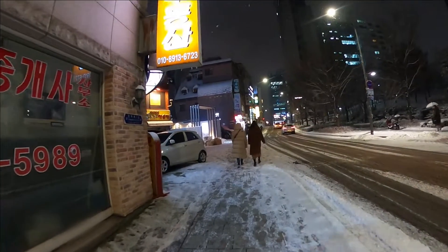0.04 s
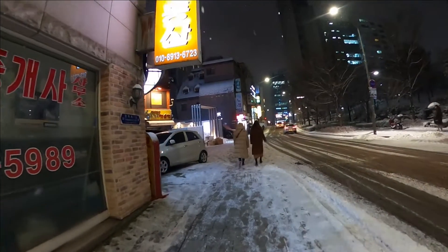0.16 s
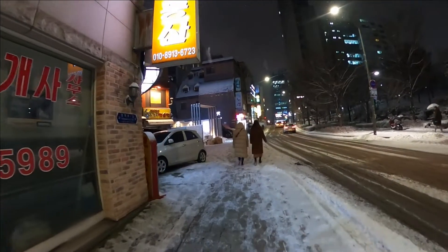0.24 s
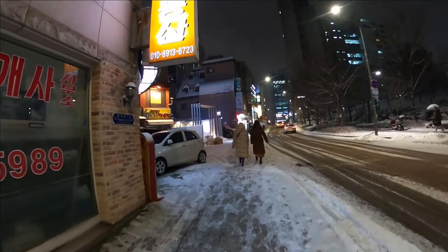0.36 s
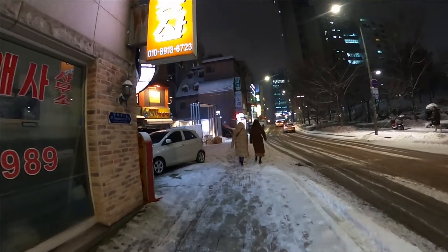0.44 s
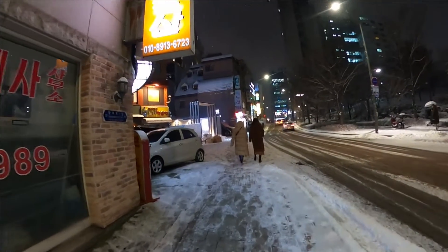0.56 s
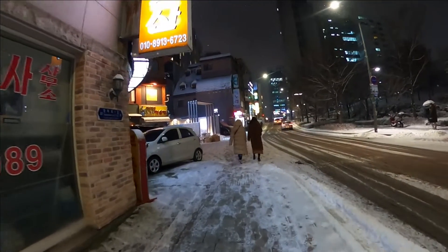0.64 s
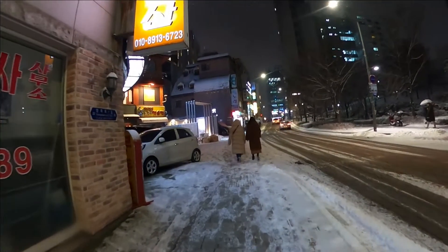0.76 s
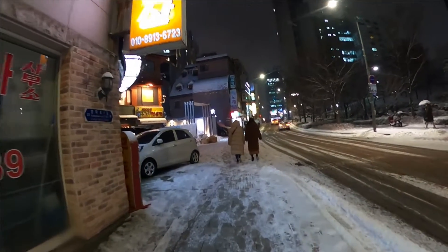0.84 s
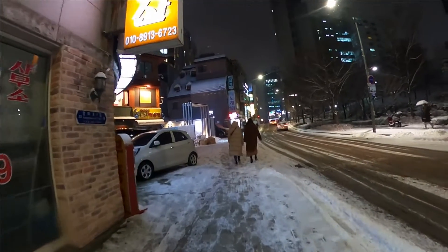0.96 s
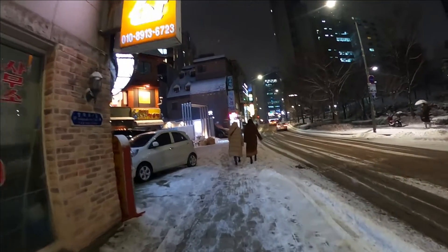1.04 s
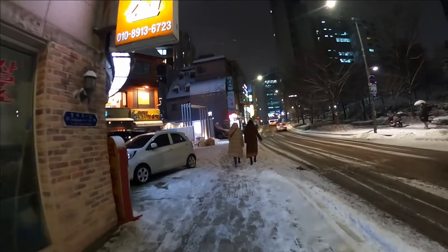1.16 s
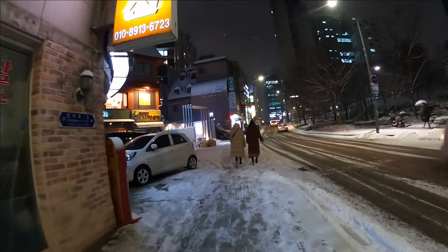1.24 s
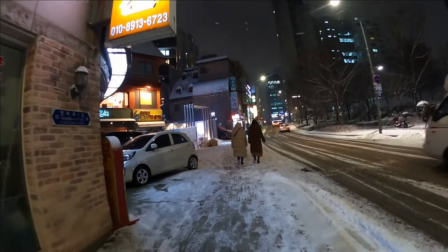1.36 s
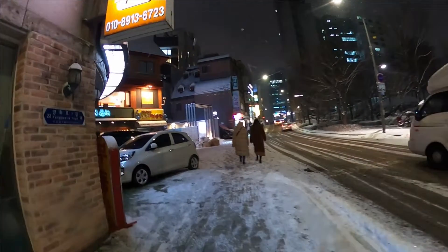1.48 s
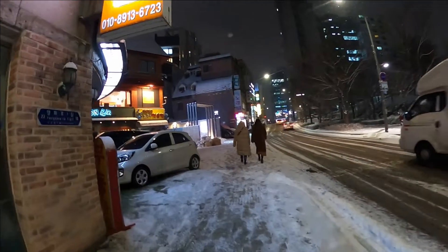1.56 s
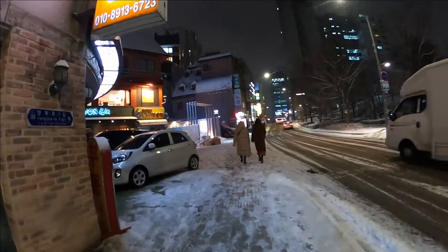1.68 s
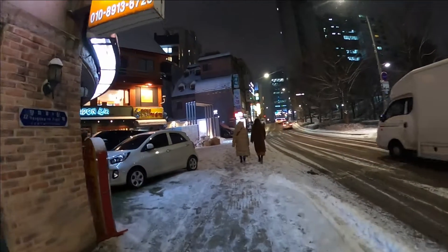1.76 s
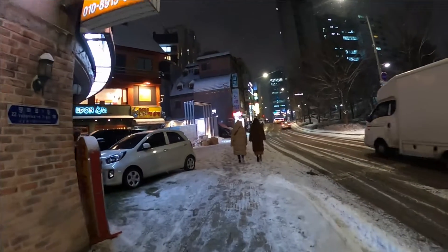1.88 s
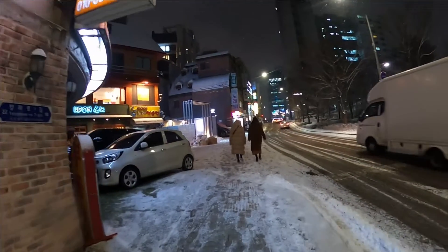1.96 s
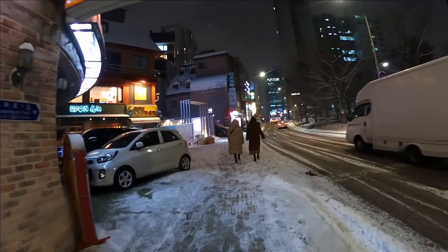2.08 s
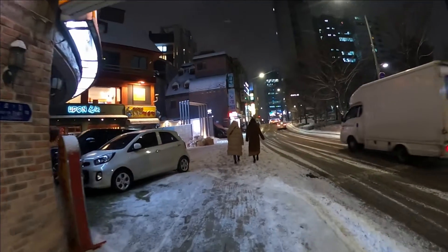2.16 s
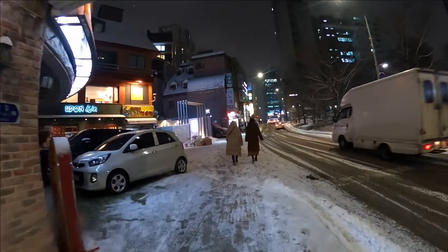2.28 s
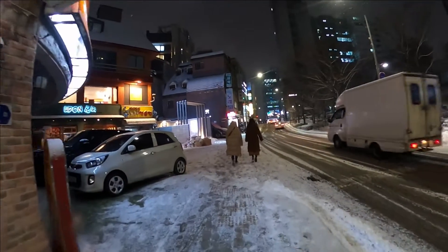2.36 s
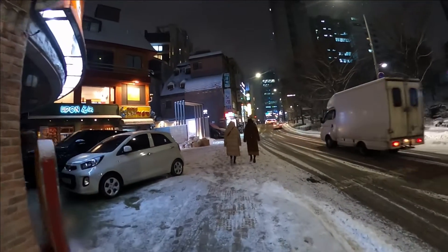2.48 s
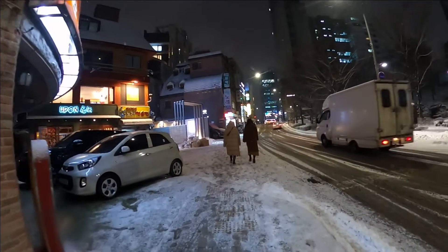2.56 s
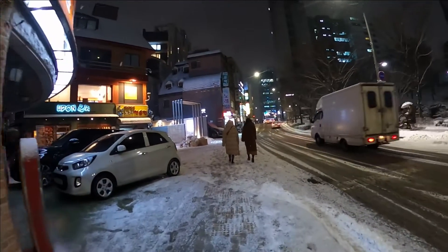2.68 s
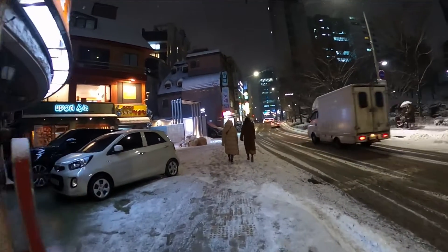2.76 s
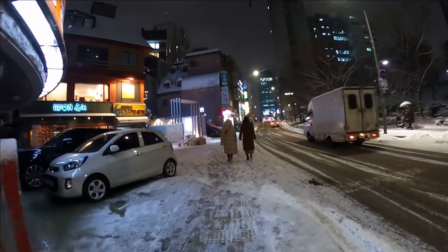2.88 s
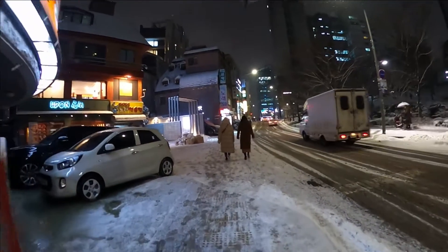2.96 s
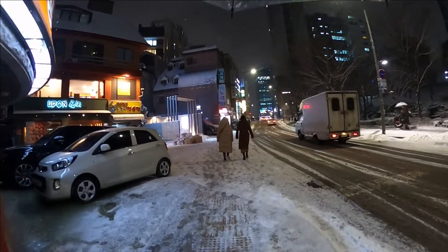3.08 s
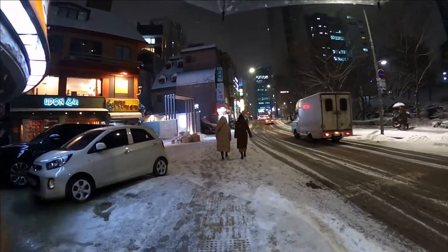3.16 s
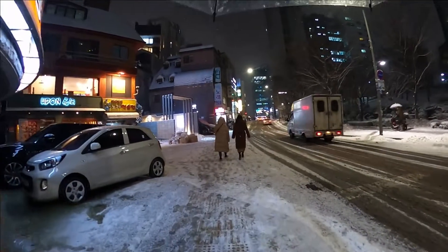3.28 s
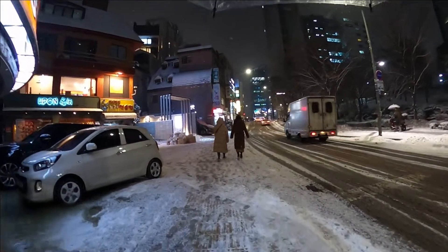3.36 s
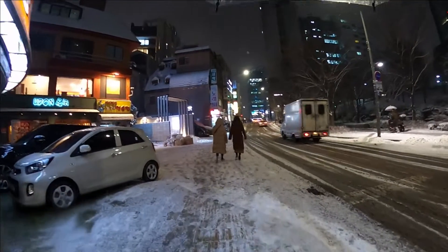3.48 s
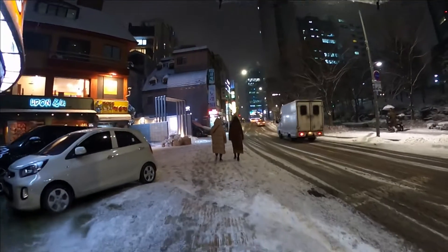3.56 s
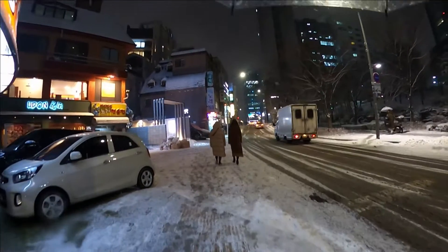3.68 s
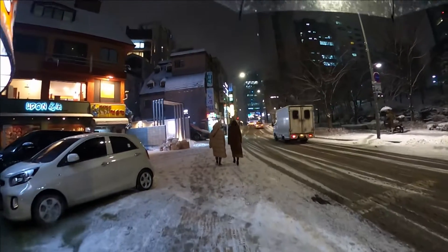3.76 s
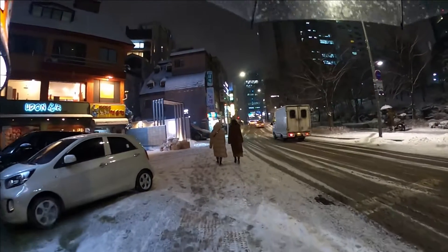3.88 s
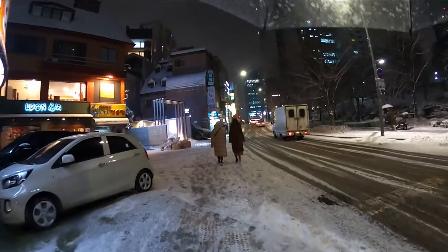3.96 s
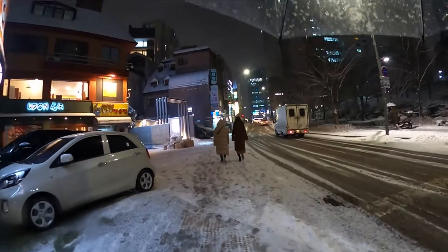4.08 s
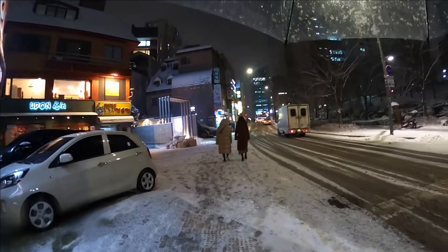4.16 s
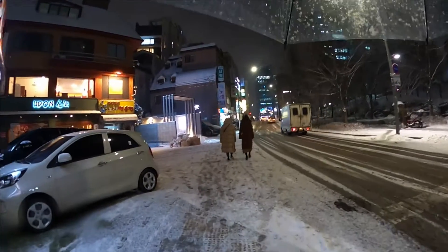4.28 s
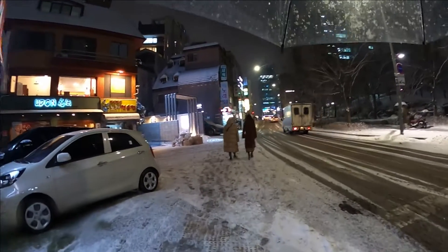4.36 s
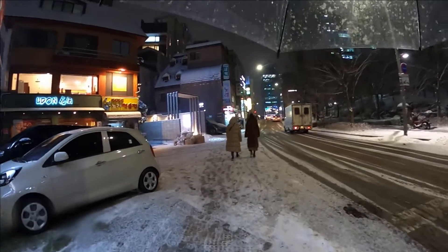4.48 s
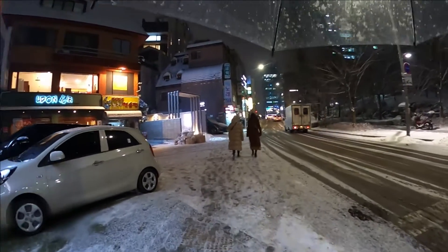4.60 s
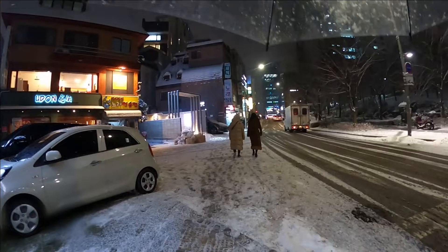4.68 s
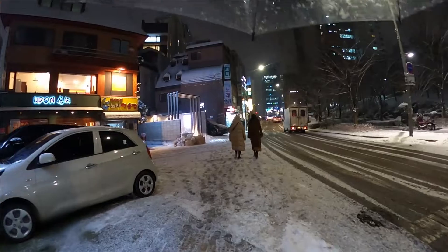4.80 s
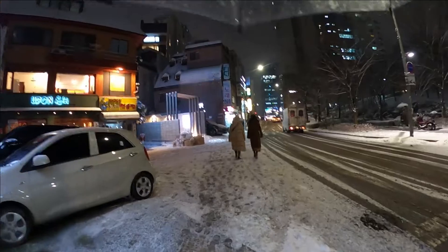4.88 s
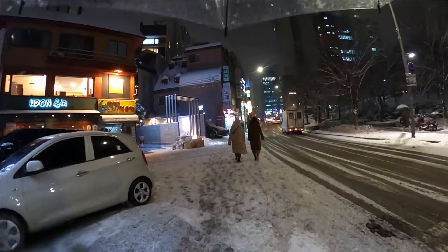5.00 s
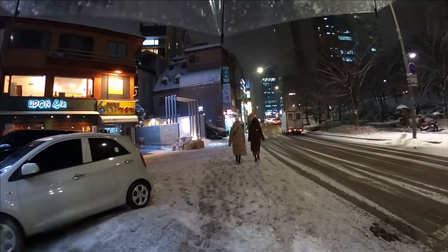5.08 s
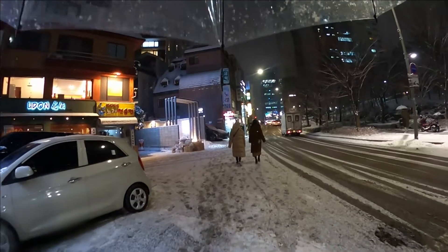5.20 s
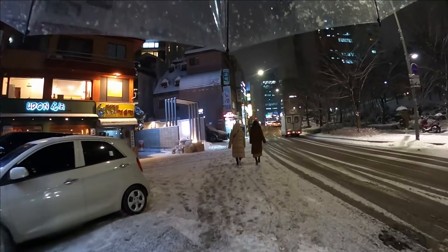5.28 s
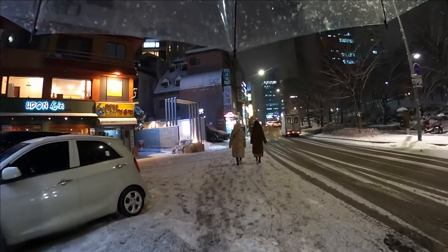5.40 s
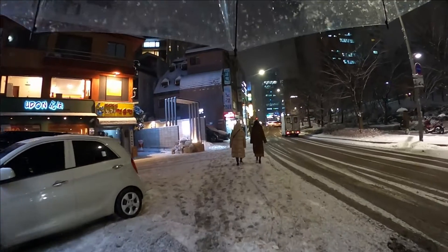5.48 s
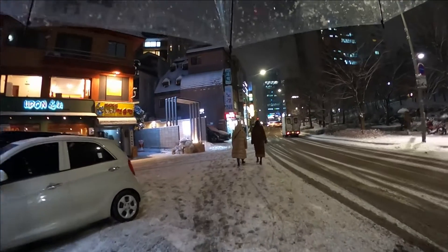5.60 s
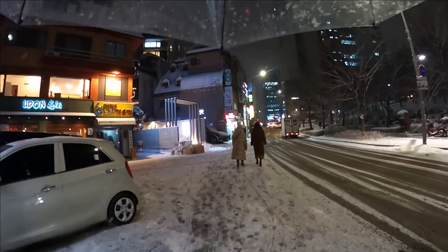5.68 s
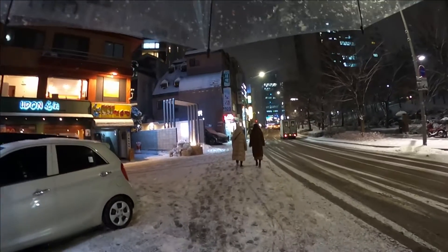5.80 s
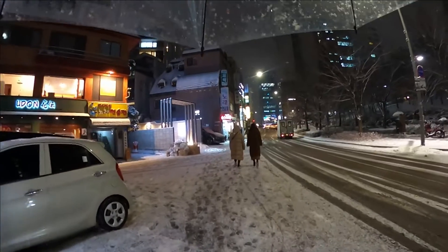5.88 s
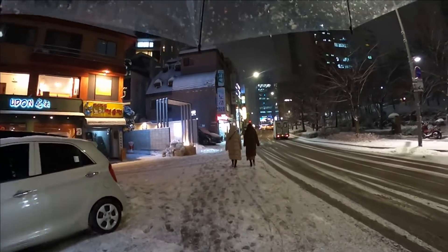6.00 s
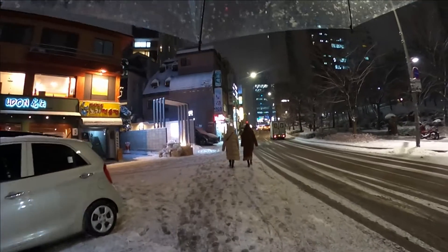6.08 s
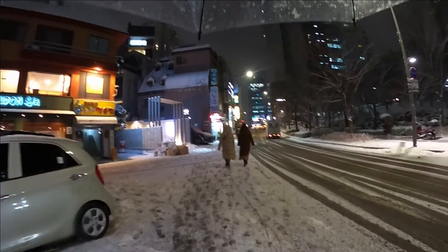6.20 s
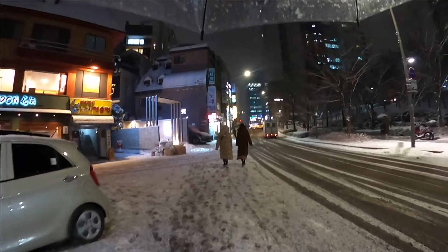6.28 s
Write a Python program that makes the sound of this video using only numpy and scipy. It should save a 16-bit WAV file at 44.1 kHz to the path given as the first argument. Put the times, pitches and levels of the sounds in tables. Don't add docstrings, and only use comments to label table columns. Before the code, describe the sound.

Outdoor stereo recording on a snowy city pavement at night. A box van passes close, its tyres roaring and hissing through slush over a low engine drone. After about two seconds it falls away sharply and dulls into distant wash. Wind buffets the microphones, wet drips tick, and later a shoe scuffs slush beside faint coat rustle and buzzing.

```python
import sys
import numpy as np
from scipy import signal
from scipy.io import wavfile
from scipy.ndimage import uniform_filter1d

SR = 44100
rng = np.random.default_rng(int(sys.argv[2]) if len(sys.argv) > 2 else 0)


def to_wav(sig):
    pcm = np.clip(np.atleast_2d(sig), -1, 1) * 32767
    pcm = np.round(pcm).astype(np.int16)
    wavfile.write(sys.argv[1], SR, pcm.T)


def linear_from_db(decibels):
    return 10 ** (np.asarray(decibels, float) / 20)


N = 279592
SIZE, HOP = 1024, 256
HZ = np.fft.rfftfreq(SIZE, 1 / SR)[:, None]
FRAMES = np.arange(N // HOP + 5) * HOP / SR
TIME = np.arange(N) / SR

# time_s, loudness_db (below the closest pass), slush_wetness_db
VAN_PASSAGE = [(0, -5.5, 0), (.15, -2.5, 0), (.32, -2, 0.5), (.56, -1, 1), (.97, 0, 1), (1.41, 0.5, 0),
               (1.85, 1, -1.5), (1.98, .5, -0.5), (2.07, -2.5, -1.5), (2.17, -7, 0), (2.33, -11.5, 1.5),
               (2.6, -14.5, 3), (3.0, -16.5, 2.5), (3.3, -18, 1), (3.74, -19, 3.5), (4.08, -16.5, -5.5),
               (4.35, -19, -1.5), (4.8, -19.5, -3.5), (5.15, -21.5, -3), (6.34, -21, -2.5)]
# frequency_hz, density_db (per Hz)
NEAR_COLOUR = [(70, -28), (120, -4), (180, -4.5), (290, -9.5), (450, -10.5), (560, -7.5), (800, -15),
               (1120, -12), (2640, -14), (6100, -17), (7730, -23), (9650, -41.5), (13000, -56),
               (15300, -55)]
# frequency_hz, density_db (per Hz)
FAR_COLOUR = [(70, -50), (120, -12), (170, -2), (290, -9), (400, -12.5), (560, -11.5), (730, -16),
              (1290, -19), (2200, -24), (3400, -25), (6300, -37), (8200, -44.5), (12900, -48.5),
              (15300, -65)]
# time_s, centre_hz, height_db
GROUND_ECHO = [(0, 2740, 4), (.5, 2780, 1), (.9, 2940, 2), (1.3, 1980, 0.5), (1.8, 1480, 2.5),
               (2.3, 1400, 3.5), (3, 1720, 3.5), (6.34, 1630, 2)]
# level_db (at the pass), loudness_share, wetness_share, gone_db (added once gone)
TYRE_LAYERS = [
    (-28.5, 0.6, 0.5, 0.05),
    (-25, 1, .01, 0),
    (-32.5, 1.035, 0.9, -0.3),
    (-52.5, 0.79, 1.54, -24.5),
]
# frequency_hz, side_minus_mid_db
PORT_WIDTH = [(60, -9), (200, -36), (700, -22), (1050, -22), (1300, -8), (1700, -4), (2400, -6.5),
              (4400, -5), (8100, -4.5), (11000, -4), (15000, -6)]
# frequency_hz, density_db (per Hz)
RUMBLE_COLOUR = [(8.8, -32), (15, -2), (43, 5.5), (135, -7), (173, -10), (219, -9.5), (284, -29),
                 (400, -23.5), (520, -57), (880, -120)]
# top_s, level_db, rise_s, fall_s
WIND_SWELLS = [(.21, -23.5, 0.06, 0.035), (.31, -26, 0.036, 0.13), (.55, -24, 0.11, 0.18),
               (1.52, -24.5, 0.033, 0.046), (1.61, -22, .05, .05), (1.84, -29, 0.24, 0.045),
               (1.98, -19.5, .08, 0.054), (2.17, -26.5, 0.13, 0.036), (2.28, -31, 0.057, 0.064),
               (3.23, -31, 0.04, 0.056), (3.47, -30, 0.17, .04), (3.7, -36, 0.39, 0.17),
               (3.88, -29, 0.095, 0.11), (3.98, -27, .1, 0.039), (4.32, -35.5, 0.053, 0.27),
               (4.59, -26, 0.13, 0.087), (4.7, -37, .07, 0.085), (5.05, -32.5, 0.087, .04),
               (5.15, -46, .1, 0.19), (5.66, -41, .3, .04), (5.77, -45, .05, 0.12), (6.2, -43, .35, .4)]
# time_s, peak_db
PORT_POPS = [(.342, -26), (.394, -25), (.468, -18), (.594, -21), (.732, -25), (1.293, -26), (1.732, -27),
             (1.835, -14), (1.961, -6), (2.095, -24), (2.168, -24), (2.269, -20)]
# start_s, length_s, pitch_hz, level_db,
# drift_db_per_s
DRONE_LINES = [(0.0499, 0.553, 94.6, -31, 0.5), (1.3, .27, 81, -29.5, -12), (1.3, 0.223, 82, -36, 7),
               (0.11, .58, 189, -34, -1), (3.75, 0.78, 4830, -70, -2), (1.3, 1.2, 192.8, -34, -16),
               (.82, 0.17, 166, -34.5, 25), (1.06, 0.47, 168, -36, 2), (1.72, 0.37, 166, -23, -35),
               (2.14, 0.27, 169, -37, -50), (2.68, 1.53, 170, -43, -2), (5.55, 0.398, 175.5, -42.5, 3),
               (0.63, 0.42, 95, -27, 2), (.92, 1.75, 331, -37.5, -5.5), (1.08, 0.94, 535, -41.5, 7.5),
               (1.8, 0.68, 536, -37.5, -15), (3.1, 1.85, 536, -55.5, 1), (.03, 0.94, 569, -49, 12.5),
               (1.14, .13, 582, -35, 5), (1.25, .95, 520, -40, -6), (2.95, 1.64, 581, -52, -2),
               (1.0, .9, 399, -45, 2), (0.023, .5, 530, -64, .1), (1.4, 0.33, 241, -41, -3)]
# start_s, peak_db, pitch_hz, ring_s (fall by 60 dB)
SNOW_DRIPS = [(.167, -17, 2400, 0.011), (1.513, -12, 1500, 0.016), (2.021, -14.5, 1620, 0.011),
              (2.3836, -19, 1270, .011), (3.042, -38, 830, .012), (4.321, -32, 1649, .013),
              (3.9, -38, 2800, 0.015), (4.474, -29, 1240, 0.012), (4.632, -27, 775, 0.036),
              (4.634, -35, 2940, .025), (4.645, -26, 960, 0.0094), (5.321, -38, 1690, 0.013)]
# start_s, peak_db, pitch_hz, ring_s (fall by 60 dB)
HOLLOW_BUMPS = [
    (3.0, -30.5, 249, 0.25),
    (4.636, -27.5, 286, 0.12),
    (4.64, -34, 900, .07),
    (4.66, -35, 580, 0.053),
]
# top_s, level_db, rise_s, fall_s
COAT_SWISHES = [(2.85, -82, .5, 1.0), (3.73, -73, .2, .04), (4.46, -77, .12, .06), (4.3, -86, .3, .2),
                (4.65, -81, 0.033, .3), (5.01, -80, .2, .2), (5.4, -74, .12, 0.22), (5.52, -72, .2, .15),
                (5.655, -77, .03, .15), (6.22, -73, .08, 0.19), (6.31, -72, .06, .1)]
# frequency_hz, density_db (per Hz)
COAT_COLOUR = [(2000, -33), (4000, 3.5), (7000, -1.5), (10000, -10.5), (13000, -18.5), (14500, -21),
               (15600, -30)]
# top_s, level_db, rise_s, fall_s
SHOE_DRAGS = [
    (4.638, -35.5, .01, 0.16),
    (4.325, -49, .012, .03),
    (4.97, -50, .07, .055),
]
# centre_hz, width_hz, level_db
SHOE_RINGS = [(286, 250, 4.5), (576, 130, 8.5), (900, 250, 8), (1400, 950, 5), (2040, 1600, -1),
              (2920, 1200, -9.5), (4800, 2800, -18)]
# top_s, level_db, rise_s, fall_s
BUZZ_SWELLS = [(4.62, -59.5, .2, .15), (4.93, -57.5, 0.074, 0.13), (5.55, -59.5, .24, 0.33),
               (5.86, -58.5, .07, 0.22), (6.22, -60.5, 0.14, 0.26)]
# multiple (of twice the mains), level_db
BUZZ_ORDERS = [(5, -8), (7, -7), (9, -0.5), (10, 6.5), (11, -5), (12, -34), (13, -3.5), (14, -10)]


def evened(x):
    return x / np.sqrt(np.mean(abs(x) ** 2) + 1e-20)


def colour(points):
    hz, value = np.transpose(points)
    return np.interp(np.log(HZ + 1), np.log(hz + 1), value)


def curves(rows, t):
    s, *columns = np.transpose(rows)
    return [np.interp(t, s, column) for column in columns]


def chance():
    z = rng.standard_normal((len(FRAMES), len(HZ), 2))
    return (z[..., 0] + 1j * z[..., 1]).T


def sound(spectra):
    return signal.istft(spectra, nperseg=SIZE, noverlap=SIZE - HOP)[1][..., :N] / 27.4


def in_band(gain, lo_hz, hi_hz):
    inside = (HZ >= lo_hz) & (HZ < hi_hz)
    return gain / np.sqrt(np.mean(gain ** 2 * inside, axis=0))


def patches(bins, frames):
    z = rng.standard_normal((len(FRAMES), len(HZ))).T
    z = uniform_filter1d(z, size=bins, axis=0)
    return evened(uniform_filter1d(z, size=frames, axis=1))


def resonate(x, hz, width_hz):
    turn = np.exp(2j * np.pi * np.cumsum(hz * np.ones(len(x))) / SR)
    r = np.exp(-np.pi * width_hz / SR)
    return 2 * (turn * signal.lfilter([1 - r], [1, -r], x / turn)).real


def resonate_twice(x, hz, width_hz):
    return resonate(resonate(x, hz, width_hz), hz, width_hz)


def swells(rows, t):
    drop_db, drop_curve = -12.5, 1.47
    coarse = t[::64]
    power = np.zeros(len(coarse))
    for s, db, rise, fall in rows:
        away = np.where(coarse < s, (s - coarse) / rise, (coarse - s) / fall)
        power += linear_from_db(db + drop_db * away ** drop_curve) ** 2
    return np.interp(t, coarse, np.sqrt(power))


def slow(count, seconds):
    size = max(round(seconds * SR), 1)
    z = uniform_filter1d(rng.standard_normal(2 * SR), size=size)
    return evened(uniform_filter1d(z, size=size))[:count]


def add(mix, s, part):
    place = mix[max(round(s * SR), 0):][:len(part)]
    place += part[:len(place)]


def traffic_gain(gone):
    bump_hz, bump_db = curves(GROUND_ECHO, FRAMES)
    bump = bump_db * np.exp(-(np.log((HZ + 1) / bump_hz) / 0.2) ** 2)
    gain = linear_from_db((1 - gone) * colour(NEAR_COLOUR) + gone * colour(FAR_COLOUR) + bump)
    edges_hz = [140, 900, 3500, 9000, 15000]
    above = [1] + [1 / (1 + (hz / (HZ + 1)) ** 8) for hz in edges_hz[1:4]] + [0]
    loud, wet = curves(VAN_PASSAGE, FRAMES)
    power = 0
    for k, (db, loud_share, wet_share, gone_db) in enumerate(TYRE_LAYERS):
        level = linear_from_db(db + loud_share * loud + wet_share * wet + gone_db * gone)
        power = power + (above[k] - above[k + 1]) * (level * in_band(gain, *edges_hz[k:k + 2])) ** 2
    splash = 0.69 * patches(14, 10) + 0.61 * patches(150, 3) * above[1]
    walls = 1.3 * patches(3, 70)
    return np.sqrt(power) * linear_from_db(splash + walls)


def traffic():
    pass_s, turn_s, turn_share = 1.84, 0.46, 0.81
    after = np.maximum(FRAMES - pass_s, 0)
    gone = turn_share * (1 - np.exp(-after / turn_s)) + (1 - turn_share) * after / after[-1]
    gain = traffic_gain(np.clip(gone, 0, 1))
    mid = chance()
    width_db = np.maximum(-6.5 - 27.5 * np.maximum(FRAMES - 2.12, 0), -40)
    lean_s, rise_s, fall_s = 1.6, 0.65, 0.92
    lean = -0.57 * np.exp(-((FRAMES - lean_s) / np.where(FRAMES < lean_s, rise_s, fall_s)) ** 2)
    lead = 0.28 * np.maximum(1 - FRAMES / 3.1, 0)
    aim = (lean + 1j * lead) / (1 + (HZ / 7500) ** 6)
    side = aim * mid + np.sqrt(np.clip(1 - abs(aim) ** 2, 0, 1)) * chance()
    side = side * linear_from_db(width_db + colour(PORT_WIDTH) + 5.5)
    return sound(gain * mid), sound(gain * side)


def rumble():
    return sound(in_band(linear_from_db(colour(RUMBLE_COLOUR)), 15, 140) * chance())


def wind_on_both_ports():
    van_bass = linear_from_db(-27.5 + 0.74 * curves(VAN_PASSAGE, TIME)[0])
    return linear_from_db(2.5) * np.hypot(swells(WIND_SWELLS, TIME), van_bass) * rumble()


def wind_on_one_port():
    draught = (1.96, -50.5, 3, 0.66)
    gusts = swells([(s, db - 28, 0.14, 0.14) for s, db in PORT_POPS] + [draught], TIME)
    lumps = linear_from_db(5.4 * evened(uniform_filter1d(rng.standard_normal(N), size=900)))
    out = gusts * lumps * rumble()
    flaps = swells([(s, db - 23, 0.014, 0.014) for s, db in PORT_POPS], TIME)
    out += flaps * evened(resonate_twice(rng.standard_normal(N), 230, 180))
    pop_hz = 70
    t = np.arange(-.04, .04, 1 / SR)
    shape = np.exp(-abs(t * pop_hz / 0.42) ** 1.4)
    for s, db in PORT_POPS:
        add(out, s + t[0], linear_from_db(db) * shape * np.cos(2 * np.pi * (pop_hz * t + rng.random())))
    return out


def drones():
    out = np.zeros(N)
    for start, length, pitch_hz, db, drift in DRONE_LINES:
        t = np.arange(0, length, 1 / SR)
        hz = pitch_hz * (1 + .004 * slow(len(t), 0.096))
        edge = np.clip(np.minimum(t, length - t) / 0.028, 0, 1)
        gain = edge * linear_from_db(db + drift * t + 1.4 * slow(len(t), 0.035))
        tone = np.sqrt(2) * np.sin(2 * np.pi * np.cumsum(hz) / SR)
        noise = rng.standard_normal(len(t))
        fuzz = evened(resonate(resonate(noise, hz, 18.0), hz, 17.5))
        add(out, start, gain * (0.85 * tone + 0.51 * fuzz))
    return out


def drips_and_bumps():
    out, t = np.zeros(N), np.arange(SR // 3) / SR
    for s, db, hz, ring in SNOW_DRIPS + HOLLOW_BUMPS:
        fall = np.exp(-np.log(1000) * t / ring)
        start = np.minimum(t * hz / 0.3, 1)
        add(out, s, linear_from_db(db) * fall * start * np.sin(2 * np.pi * hz * t))
    return out


def coat():
    gain = in_band(linear_from_db(colour(COAT_COLOUR) + 2.4 * patches(200, 2)), 9600, 15000)
    return linear_from_db(1.0) * swells(COAT_SWISHES, TIME) * sound(gain * chance())


def scuff():
    t = np.arange(4.25, 5.15, 1 / SR)
    lumps = evened(uniform_filter1d(rng.standard_normal(len(t)), size=130))
    grains = rng.standard_normal(len(t)) * linear_from_db(1.9 * lumps)
    grains = signal.sosfilt(signal.butter(4, 5500, fs=SR, output='sos'), grains)
    rings = [evened(resonate_twice(grains, hz, width)) * linear_from_db(db) for hz, width, db in SHOE_RINGS]
    shape = swells(SHOE_DRAGS, t)
    mid, side = np.zeros(N), np.zeros(N)
    add(mid, t[0], evened(sum(rings)) * shape)
    add(side, t[0], rings[-1] * shape * linear_from_db(-16))
    return mid, side


def buzz():
    turns = 119.9 * TIME
    wobble = slow(2 * SR, .01)
    flicker = linear_from_db(2.1 * np.interp(TIME, np.linspace(0, N / SR, len(wobble)), wobble))
    tones = np.zeros(N)
    for k, db in BUZZ_ORDERS:
        tones += linear_from_db(db + 4.5) * np.sin(2 * np.pi * (k * turns + rng.random()))
    return flicker * swells(BUZZ_SWELLS, TIME) * tones


def scene():
    one_port = wind_on_one_port()
    wind = wind_on_both_ports() + 0.36 * one_port, one_port
    mid, side = np.sum([traffic(), wind, scuff()], axis=0)
    mid = mid + drones() + drips_and_bumps() + coat() + buzz()
    return np.array([mid + side, mid - side])


def low_pass(x):
    return signal.sosfilt(signal.butter(12, 15650, fs=SR, output="sos"), x)


def record(dry):
    return low_pass(dry)


dry = scene()
out = record(dry)
to_wav(out)
```